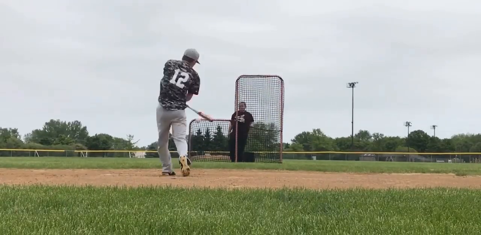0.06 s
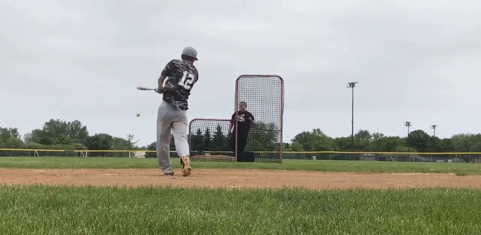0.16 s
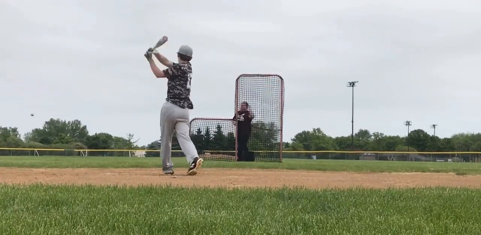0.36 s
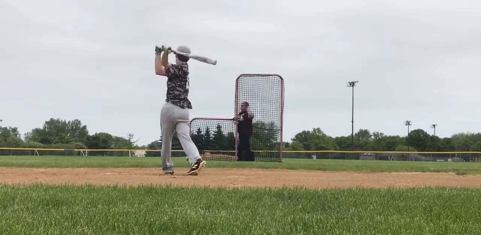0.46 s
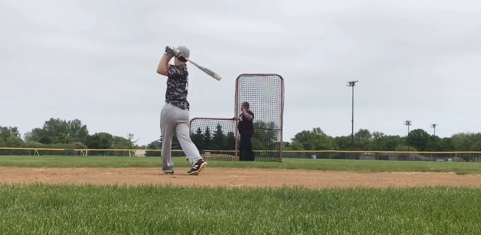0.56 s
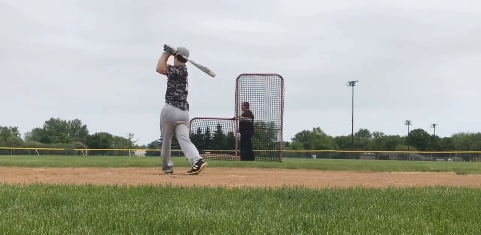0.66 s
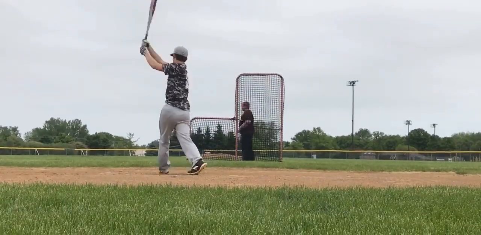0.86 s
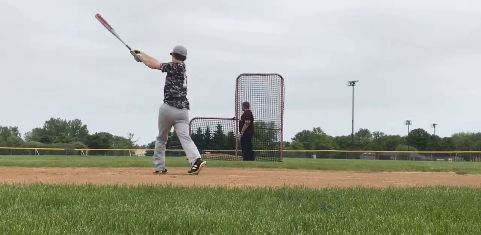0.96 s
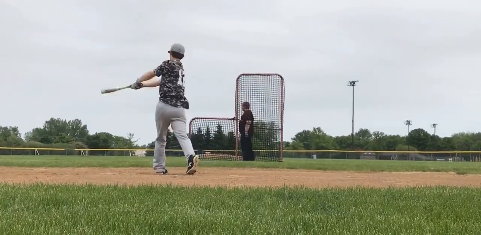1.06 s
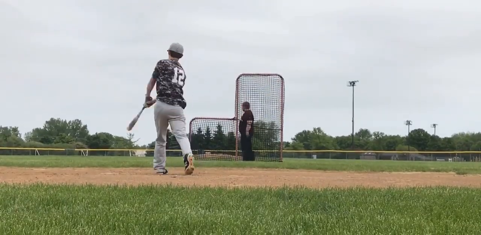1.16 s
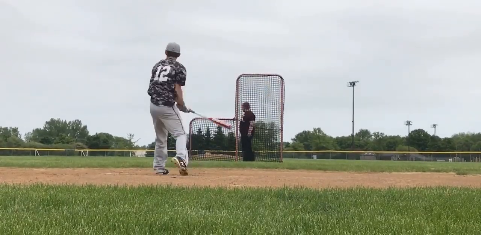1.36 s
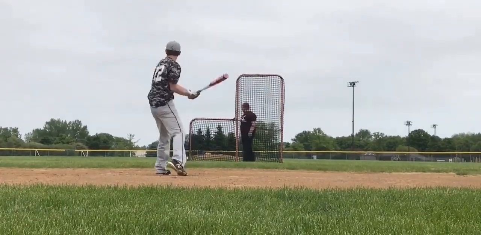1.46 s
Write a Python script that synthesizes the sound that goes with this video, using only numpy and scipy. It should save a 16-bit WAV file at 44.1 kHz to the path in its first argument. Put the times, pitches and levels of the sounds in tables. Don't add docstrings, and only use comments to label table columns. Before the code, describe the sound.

A metal bat strikes a baseball early on with a sharp crack and short thud, then a high ping swells and fades over a quiet open field with distant mower drone, heard by a phone some metres away.

```python
import sys
import numpy as np
from scipy import signal
from scipy.fft import rfft, irfft
from scipy.io import wavfile

SR = 44100
rng = np.random.default_rng(int(sys.argv[2]) if len(sys.argv) > 2 else 0)


def dump(signal):
    limited = np.clip(np.atleast_2d(signal).T, -1, 1)
    pcm = np.round(limited * 32767).astype(np.int16)
    wavfile.write(sys.argv[1], SR, pcm)


def elevation(decibels):
    levels = np.asarray(decibels, float)
    return 10 ** (levels / 20)


N = 66150
HIT_S = 0.2402


def table(x):
    return np.array(x, float).T


def colour(x, points):
    hz, db = table(points)
    f = np.maximum(np.arange(len(x) // 2 + 1) * SR / len(x), 1)
    gain_db = np.interp(np.log(f), np.log(hz), db)
    return irfft(rfft(x) * elevation(gain_db), len(x))


def noise(hz, width_hz):
    f = np.arange(N // 2 + 1) * SR / N
    bell = np.exp(-2 * ((f - hz) / width_hz) ** 2)
    x = irfft(rfft(rng.standard_normal(N)) * bell, N)
    return x / x.std()


def walk(rate_hz):
    return noise(0, rate_hz)


def fade(t, t60_s):
    return (t >= 0) * elevation(-60 * np.maximum(t, 0) / t60_s)


def lobe(t, length_s):
    return np.cos(np.pi * np.clip(t / length_s, -0.5, 0.5))


def modes(t, rows, wobble_db=0, sense=-1):
    wobble_hz = 300
    out = 0
    for k, (hz, db, t60_s) in enumerate(rows):
        level = sense ** k * elevation(db + wobble_db * walk(wobble_hz))
        out = out + level * fade(t, t60_s) * np.sin(2 * np.pi * hz * t)
    return out


def air():
    # (frequency [Hz], density [dB per Hz])
    hiss_spectrum = [(110, -3), (200, -10.5), (330, -17), (640, -24), (780, -33), (1000, -29.5),
                     (2800, -33.5), (6500, -47.5)]
    hiss_db, flicker_db, flicker_hz = -50, 1.2, 9
    wind_db, wind_hz, wind_width_hz = -50, 55, 38
    gust_db, gust_hz = 2.5, 5
    town = colour(rng.standard_normal(N), [(60, -28.5)] + hiss_spectrum + [(16000, -78)])
    hiss = 0
    for hz in 125 * 2.0 ** np.arange(8):
        octave = [(hz / 2, -50), (hz / 1.6, -8), (hz, 0), (hz * 1.6, -8), (hz * 2, -50)]
        hiss = hiss + elevation(flicker_db * walk(flicker_hz)) * colour(town, octave)
    wind = elevation(wind_db + gust_db * walk(gust_hz)) * noise(wind_hz, wind_width_hz)
    return elevation(hiss_db) * hiss / hiss.std() + wind


def mower(t):
    # (multiple [1], level [dB])
    overtones = [(1, 1.5), (2, -17.5), (3, -25), (4, -32)]
    # (time [s], level [dB])
    load_points = [(0.0, -42), (0.082, -42.5), (0.116, -47.5), (0.162, -40), (0.484, -45.5), (0.53, -42),
                   (0.634, -42), (0.668, -52), (0.722, -38.5), (0.768, -46), (0.83, -41.5), (1.11, -42.5),
                   (1.156, -70), (1.182, -47.5), (1.278, -38.5), (1.432, -41), (1.47, -50), (1.5, -40.5)]
    firing_hz, jitter, jitter_hz = 90.4, 0.014, 17
    flutter_db, flutter_hz = -0.5, 4.7
    load_db = np.interp(t, *table(load_points))
    phase = 2 * np.pi * np.cumsum(firing_hz * (1 + jitter * walk(jitter_hz))) / SR
    out = 0
    for k, db in overtones:
        level = np.sqrt(2) * elevation(load_db + db + k * flutter_db * walk(flutter_hz))
        out = out + level * np.sin(k * phase)
    return out


def scuffs(t):
    # (centre [s], length [s], frequency [Hz], width [Hz], level [dB])
    puffs = [
        (.219, 0.014, 2300, 3130, -51.5),
        (0.241, 0.036, 3120, 344, -43),
        (0.365, 0.055, 5250, 4050, -58.5),
        (.557, 0.051, 3860, 810, -58),
        (.9, .03, 4000, 3000, -68.5),
        (1.048, 0.0018, 12740, 9030, -60),
        (1.1, .06, 8960, 11950, -72.5),
        (1.105, 0.12, 57.5, 40, -41),
    ]
    wobble_db, wobble_hz = 2.0, 300
    out = 0
    for at_s, length_s, hz, width_hz, db in puffs:
        level = elevation(db + wobble_db * walk(wobble_hz))
        out = out + level * lobe(t - at_s, length_s) ** 2 * noise(hz, width_hz)
    return out


def strike(t):
    # (frequency [Hz], gain [dB])
    crack_spectrum = [(600, -25), (2000, -7), (4300, -16), (6500, -2.5), (8000, -5.5), (13000, -6),
                      (15300, 2.5), (17000, -23)]
    main_ring = [(2860, -9, .16), (2632, -12.5, .2), (3063, -18, .04)]
    # (frequency [Hz], level [dB], t60 [s])
    wall_modes = [(2393, -34.5, 0.11), (3800, -30.5, 0.057), (4524, -20.5, 0.017), (5120, -27.5, 0.021),
                  (5600, -33, 0.076), (6110, -32, 0.042), (6930, -22, 0.013), (8646, -36.5, 0.0461),
                  (9140, -31.5, 0.042), (11040, -29, 0.024), (11750, -37, 0.029)]
    # (frequency [Hz], level [dB], t60 [s])
    thud_modes = [(178, -24.5, 0.017), (308.4, -16.5, 0.01), (613, -18.5, 0.027), (927, -18, .028),
                  (1148, -24, .02), (1553, -18.5, 0.0054)]
    crack_db, crack_t60_s, crack_lead_s = -13, 0.005, 0.0006
    spray_db, spray_t60_s = -23.5, 0.039
    push_db, push_lag_s, push_s = -0.5, 0.0005, 0.0003
    ring_lag_s, build_s = 0.0003, 0.0005
    facing_s, turned_db = 0.0098, -12
    s = t - HIT_S

    crack_env = elevation(crack_db) * fade(s + crack_lead_s, crack_t60_s)
    spray_env = elevation(spray_db) * fade(s, spray_t60_s)
    crack = colour(rng.standard_normal(N), crack_spectrum) * (crack_env + spray_env)

    pulse = lobe(s - push_lag_s, push_s) ** 2
    rebound = lobe(s - push_lag_s, 4 * push_s) ** 2 / 4
    shove = elevation(push_db) * (pulse - rebound)

    build = 1 - np.exp(-np.maximum(s, 0) / build_s)
    facing = (np.exp(-(s / facing_s) ** 4) + elevation(turned_db)) * build
    ring = modes(s - ring_lag_s, main_ring) * facing
    wall = modes(s, wall_modes, wobble_db=4)
    thud = modes(s, thud_modes, sense=0.92)
    return crack + shove + ring + wall + thud


def ringing(t):
    # (centre [s], length [s], frequency [Hz], level [dB])
    sweeps = [(.255, .02, 5600, -38), (.268, 0.01, 2610, -33.5), (.267, .03, 2885, -34.5),
              (.286, 0.026, 3060, -36), (0.29, 0.059, 2765, -41.5), (0.31, .035, 2610, -38.5),
              (0.322, 0.024, 2870, -35), (0.346, .06, 2582, -35.5), (0.351, 0.042, 2730, -29),
              (.374, 0.038, 3060, -37), (0.398, 0.068, 2759, -13.5), (0.411, 0.018, 3050, -40),
              (0.441, 0.026, 2750, -37.5), (0.442, 0.13, 3060, -53), (0.491, 0.098, 2907, -57),
              (.5, 0.064, 3020, -57), (.565, 0.028, 2670, -59), (.52, 0.024, 2776, -50),
              (.555, 0.058, 2580, -45.5), (0.598, 0.066, 2730, -55.5), (.65, 0.13, 2655, -52),
              (.71, .07, 2770, -67.5), (.775, .04, 2590, -62), (.826, 0.073, 2775, -63),
              (1.29, 0.034, 2620, -57.5), (0.289, 0.023, 5900, -47.5), (.32, 0.028, 5450, -57.5),
              (0.397, 0.035, 5580, -61)]
    # (frequency [Hz], width [Hz], level [dB], t60 [s])
    scatter = [(2590, 60, -45.5, 1.2), (2770, 33, -49.5, 1.5), (2840, 60, -47.5, .9), (3060, 60, -47, 0.52),
               (2750, 600, -37, 0.34), (3700, 1400, -42, 0.3), (1780, 4500, -49, .3),
               (5600, 1900, -42.5, .1)]
    sharpness, wobble_db, wobble_hz = 1.7, 1.5, 70
    out = 0
    for at_s, length_s, hz, db in sweeps:
        steady = db >= -25
        level = elevation(db + wobble_db * (not steady) * walk(wobble_hz))
        tone = np.sin(2 * np.pi * (hz * t + rng.random()))
        out = out + level * lobe(t - at_s, length_s) ** sharpness * tone
    for hz, width_hz, db, t60_s in scatter:
        out = out + elevation(db) * fade(t - HIT_S, t60_s) * noise(hz, width_hz)
    return out


def slaps(hit):
    # (arrival [s], level [dB], centre [Hz])
    echoes = [
        (0.2811, -25.5, 4795),
        (.3095, -37, 4720),
        (0.32, -52.5, 3500),
    ]
    smear_db, smear_t60_s = -17, 0.03
    tail_t = np.arange(2048) / SR
    out = 0
    for at_s, db, hz in echoes:
        thin = colour(hit, [(hz / 8, -6), (hz / 2.6, 0), (hz * 0.61, -10), (hz, 0), (hz * 3, -0.5)])
        tail = elevation(smear_db) * rng.standard_normal(2048) * fade(tail_t, smear_t60_s)
        thin = thin + signal.fftconvolve(thin, tail)[:N]
        out = out + elevation(db) * np.roll(thin, int((at_s - HIT_S) * SR))
    return out


def scene():
    t = np.arange(N) / SR
    hit = strike(t)
    return (air() + mower(t) + scuffs(t) + hit + ringing(t) + slaps(hit))[None]


def roll_off(x):
    return signal.sosfilt(signal.butter(12, 17150, fs=SR, output="sos"), x)


def record(dry):
    raised_db, raised_hz, from_s, to_s = -63.5, 5030, 0.2, 0.662
    self_noise_db, top_hz, low_cut_hz = -76.5, 15850, 52
    t = np.arange(N) / SR
    gate = np.clip((t - from_s) / 0.04, 0, 1) * np.clip((to_s - t) / 0.012, 0, 1)
    bright = colour(rng.standard_normal(N), [(raised_hz / 3, -12), (raised_hz, 0), (15000, -1.5)])
    hiss = elevation(raised_db) * gate * bright + elevation(self_noise_db) * rng.standard_normal(N)
    hiss = colour(hiss, [(top_hz, 0), (top_hz * 1.01, -30)])
    low_cut = signal.butter(2, low_cut_hz, "high", fs=SR, output="sos")
    return roll_off(signal.sosfilt(low_cut, dry + hiss))


dry = scene()
out = record(dry)
dump(out)
```